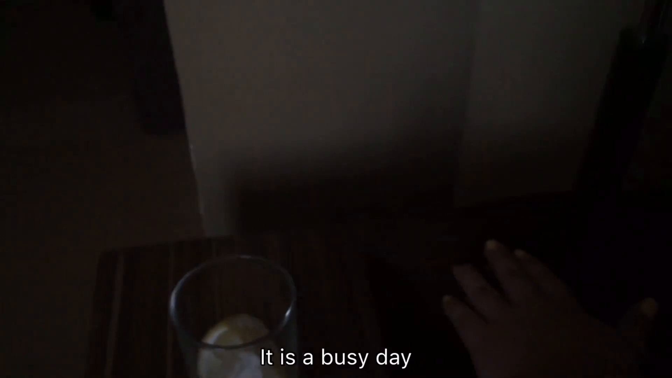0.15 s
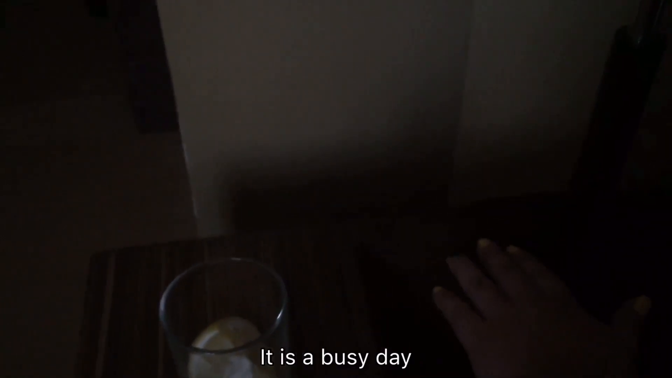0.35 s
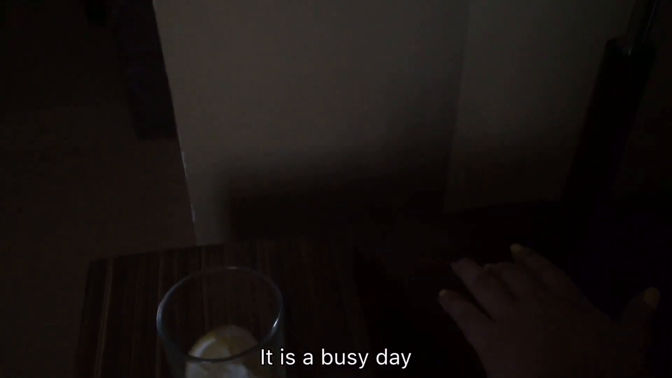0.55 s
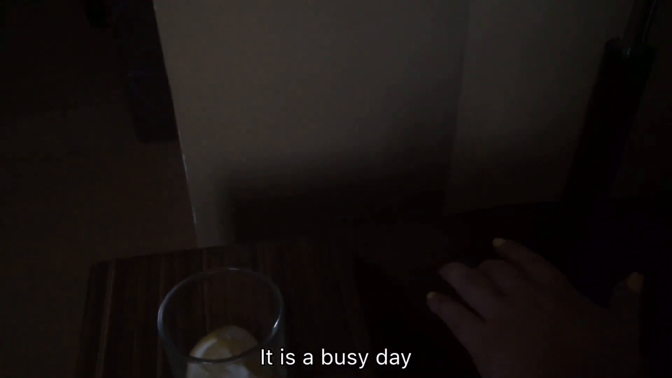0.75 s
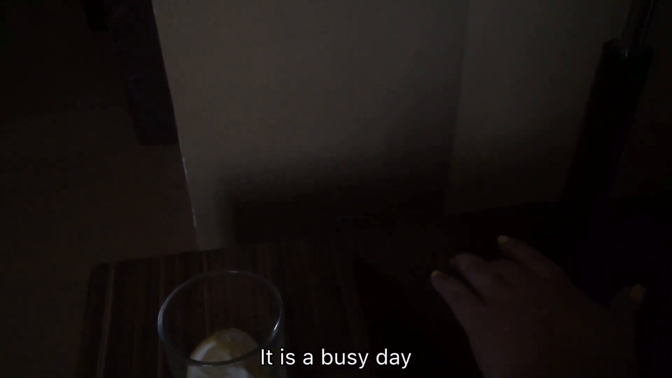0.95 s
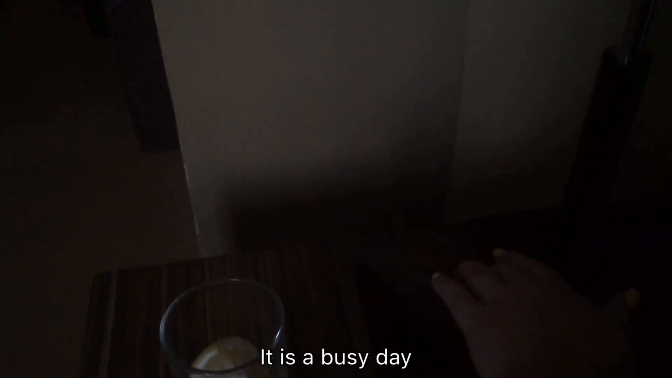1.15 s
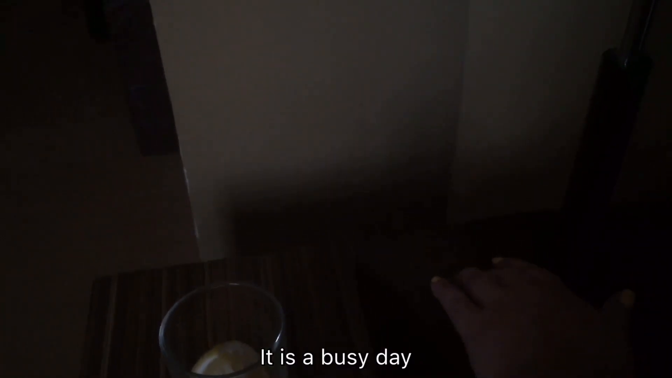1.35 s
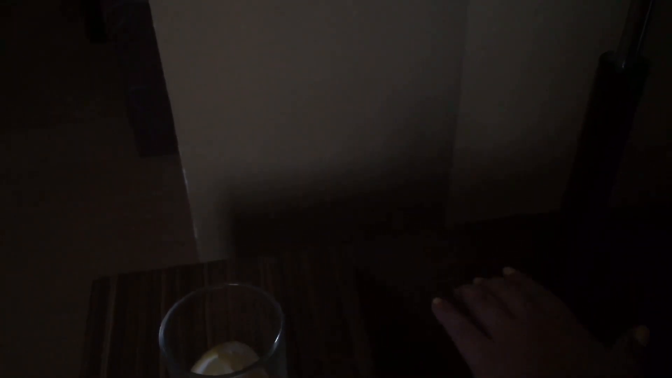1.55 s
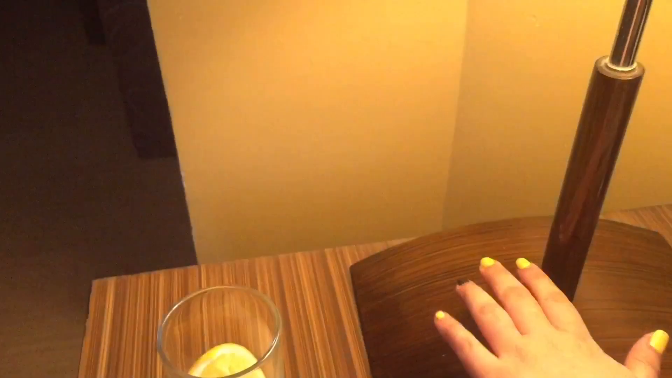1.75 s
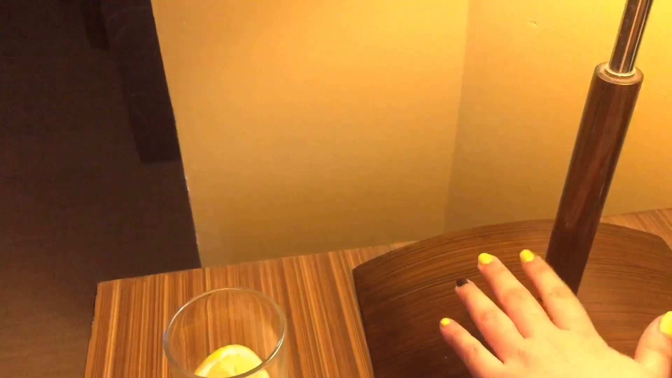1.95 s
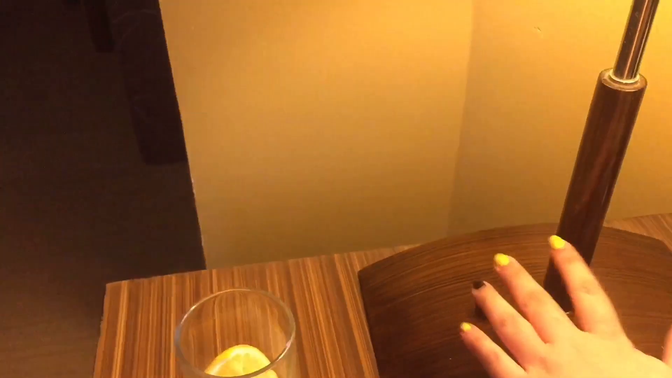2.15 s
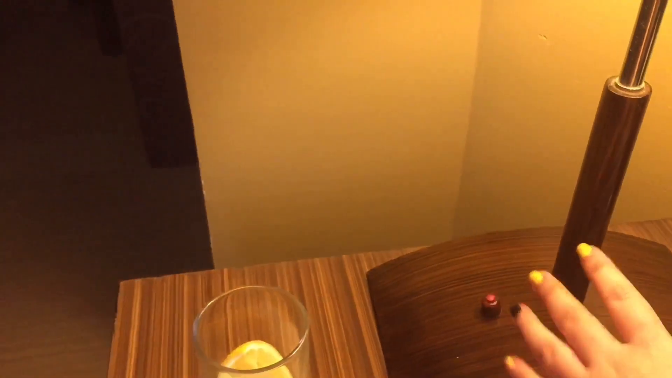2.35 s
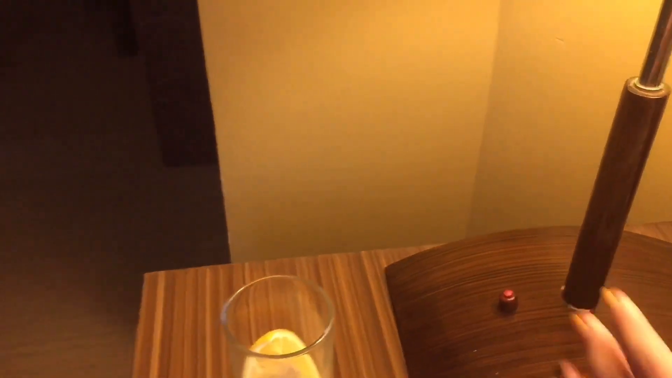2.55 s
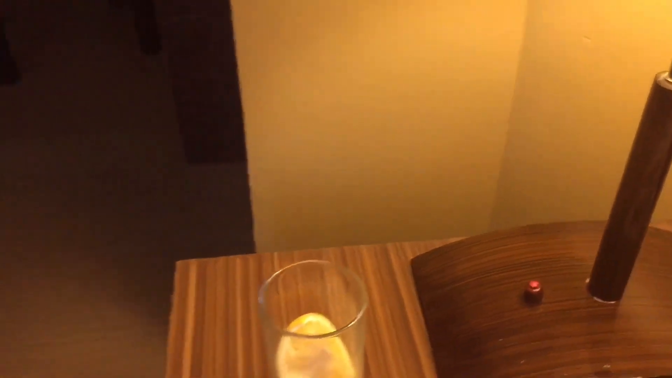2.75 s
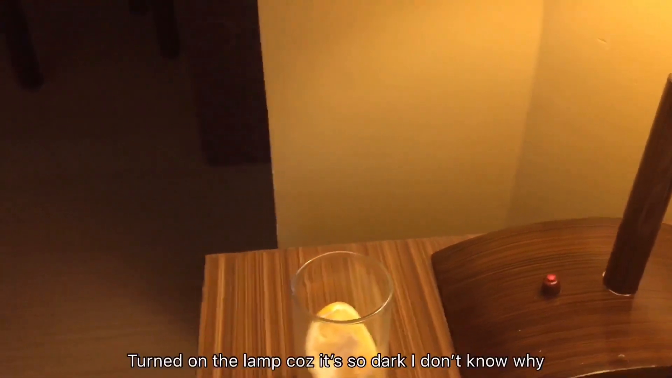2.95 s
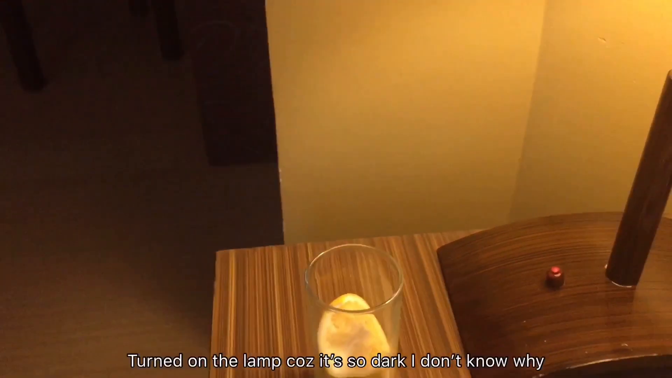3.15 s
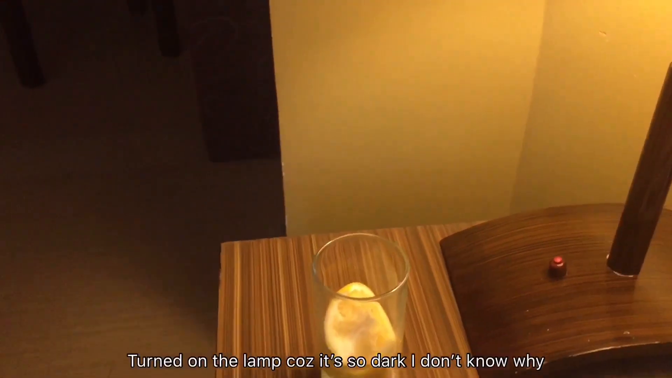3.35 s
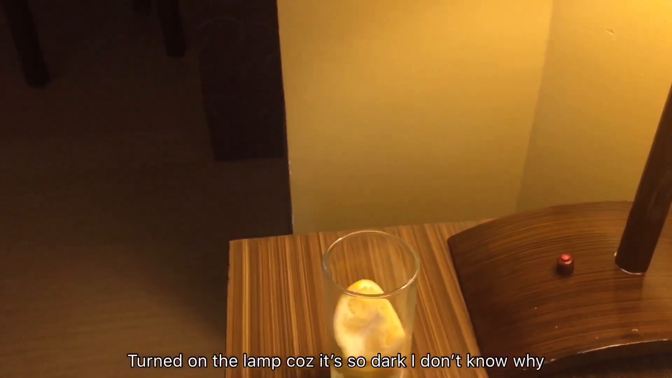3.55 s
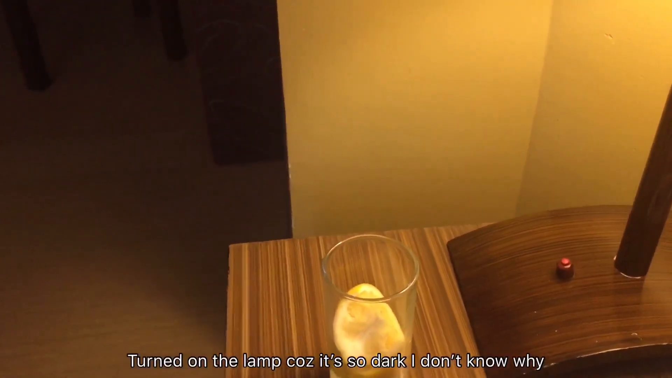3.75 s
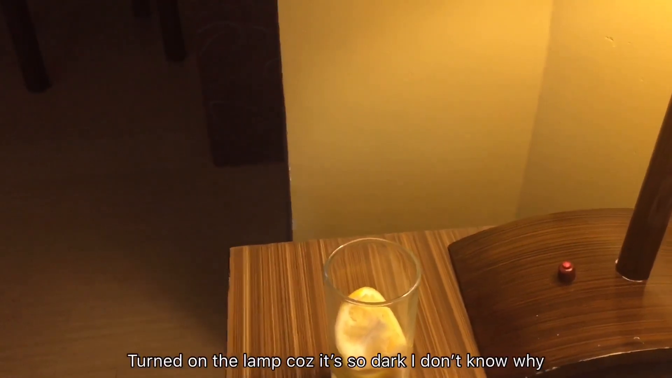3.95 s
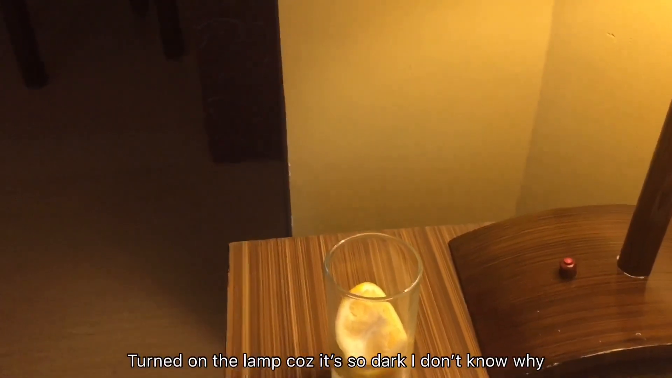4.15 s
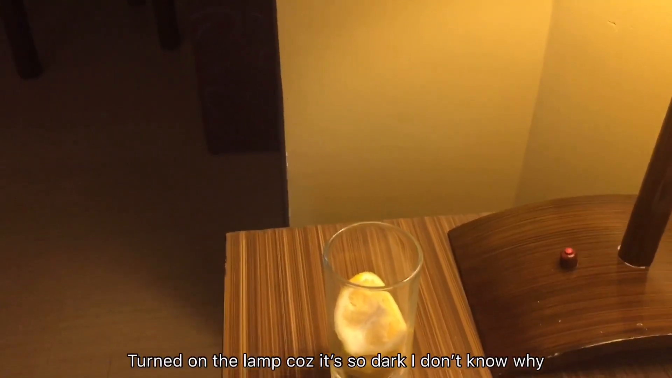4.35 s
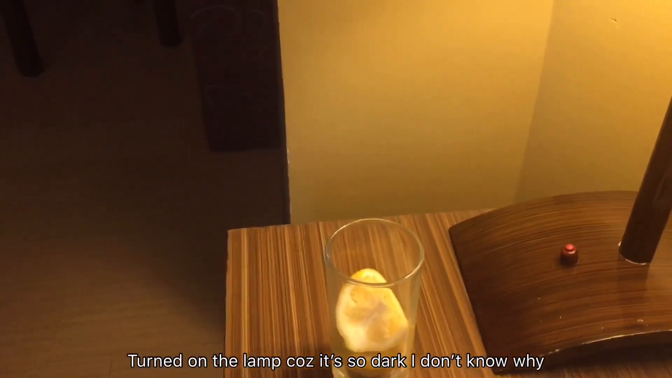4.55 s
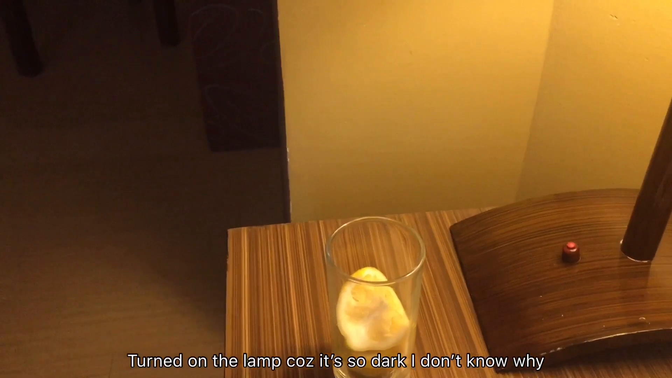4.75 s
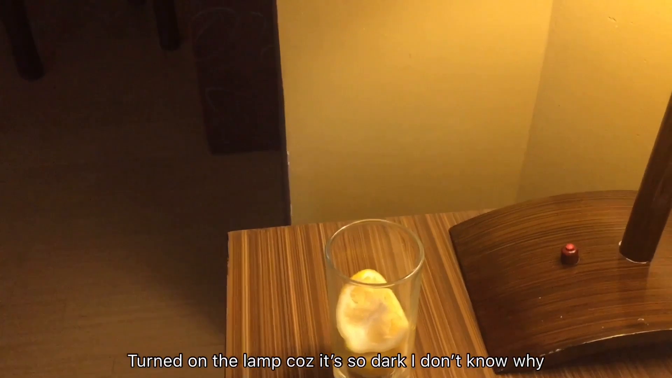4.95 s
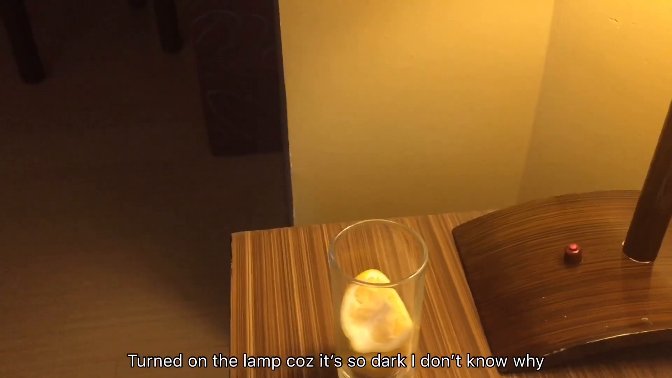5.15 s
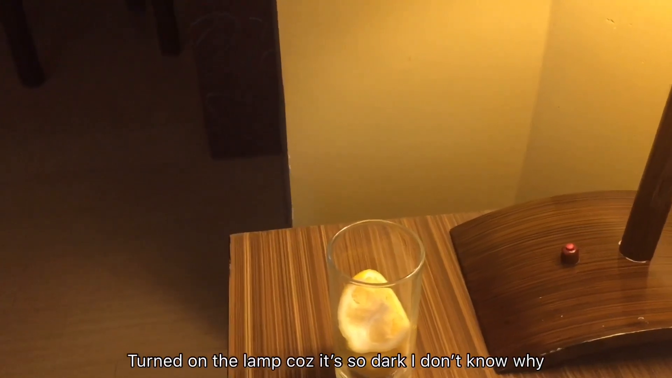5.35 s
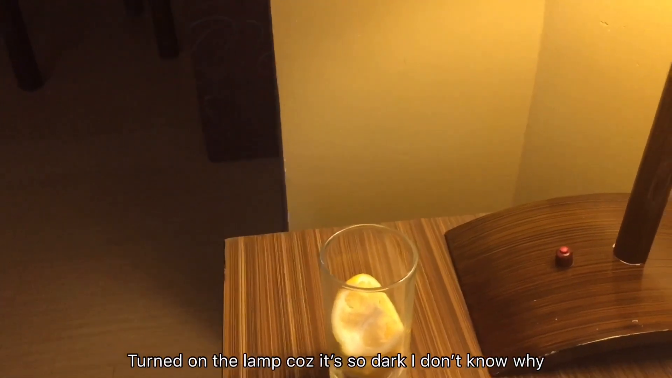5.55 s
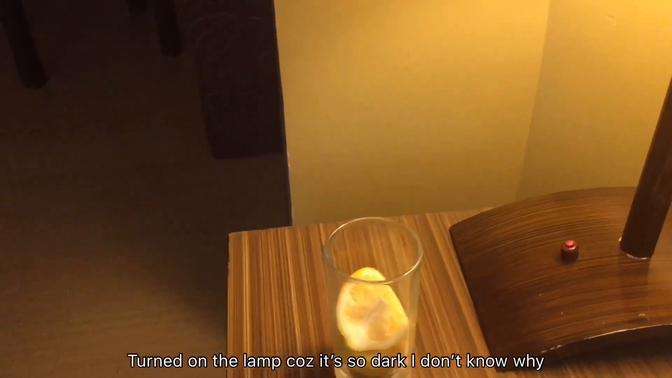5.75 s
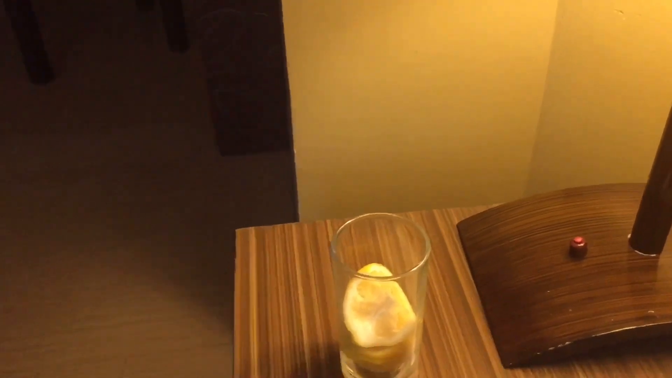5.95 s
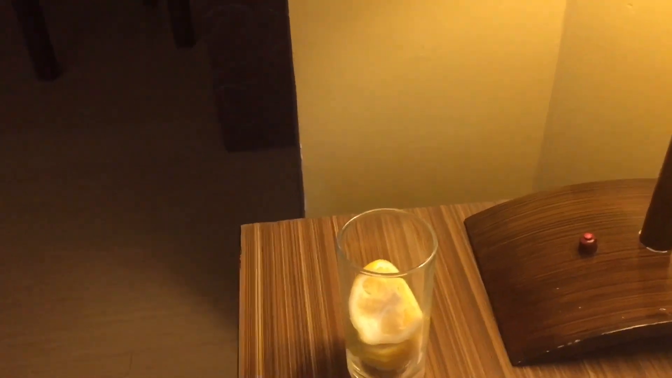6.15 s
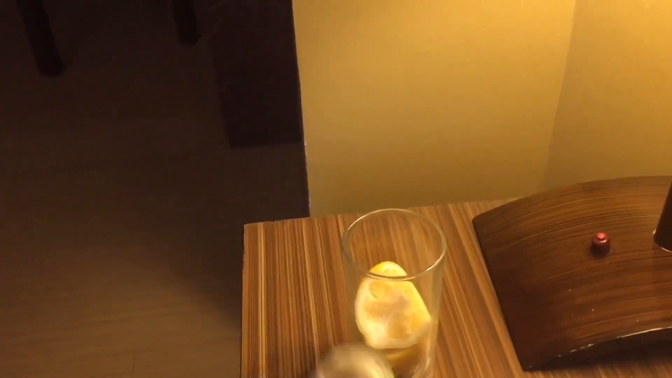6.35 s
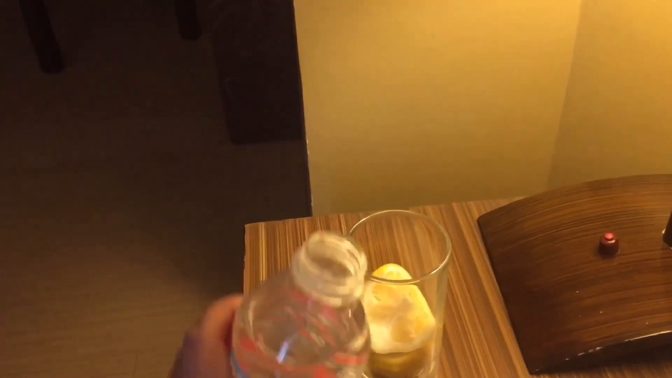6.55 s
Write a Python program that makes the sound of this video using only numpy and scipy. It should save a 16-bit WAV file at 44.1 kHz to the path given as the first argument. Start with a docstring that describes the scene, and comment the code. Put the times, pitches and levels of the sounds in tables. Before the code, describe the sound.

Two sharp switch clicks in a quiet, humming room, followed by the small snaps and creaks of a plastic bottle being opened.

```python
"""A quiet, carpeted hotel room, with the ventilation humming. A finger presses the push switch of a table
lamp: it latches, then snaps over, and the impacts excite the modes of the lamp and the wooden table.
A sleeve brushes as the hand draws back. Close by, a plastic bottle is twisted open: stick-slip friction
makes the cap rasp on its thread, the seal cracks in a few snaps, and the bottle resonates with hollow
knocks. Lamp and bottle leave a short, diffuse reverberation."""
import sys
import numpy as np
from scipy import signal
from scipy.fft import rfft, irfft
from scipy.io import wavfile
from scipy.ndimage import uniform_filter1d

SR = 44100
rng = np.random.default_rng(int(sys.argv[2]) if len(sys.argv) > 2 else 0)


def generate_wav(sig):
    """Save sig (samples, or channels by samples) to the path in sys.argv[1] as 16-bit PCM at SR."""
    pcm = np.round(np.clip(np.atleast_2d(sig).T, -1, 1) * 32767).astype(np.int16)
    wavfile.write(sys.argv[1], SR, pcm)


N = 294588
T = np.arange(N) / SR
AGE = T[:SR // 2]  # seconds since an impact

# The switch's press, then its snap. Each row: start in seconds, ring level in dB, crack tilt in dB per
# octave, crack level and table thump level in dB relative to the ring.
SWITCH_STROKES = [(1.0772, -30, -0.5, -2.5, -10.5), (1.664, -21.5, 1.3, -3.5, -9)]


def amp(db):
    """Amplitude grows tenfold for every 20 dB."""
    return 10 ** (np.asarray(db) / 20)


def level(x, db):
    """The level of a steady sound is set by its rms."""
    return x * amp(db) / np.sqrt(np.mean(x ** 2))


def burst(x, db):
    """The level of a transient is set by its energy, as the rms it would have if packed into 10 ms."""
    return x * amp(db) / np.sqrt(np.sum(x ** 2) / (SR / 100))


def add(track, s, x):
    """Superposition: x joins the track at s seconds."""
    i = int(round(s * SR))
    track[i:i + len(x)] += x[:N - i]


def band(x, low_hz, high_hz, order=2):
    """A causal band-pass filter keeps what lies between two frequencies."""
    high_hz = min(high_hz, .45 * SR)
    edges = [min(low_hz, high_hz - 10), high_hz]
    return signal.sosfilt(signal.butter(order, edges, "band", fs=SR, output="sos"), x)


def around(x, hz, width_hz):
    """A resonance acts as a band-pass whose centre is the geometric mean of its edges."""
    low_hz = np.hypot(hz, width_hz / 2) - width_hz / 2
    return band(x, low_hz, low_hz + width_hz)


def noise(points, size):
    """Spectral shaping: white noise follows (Hz, dB) points and rolls off above the last."""
    hz, db = np.transpose(points)
    f = np.fft.rfftfreq(size, 1 / SR) + 1
    gain = amp(np.interp(np.log(f), np.log(hz), db)) / np.maximum(f / hz[-1], 1) ** 2
    return irfft(rfft(rng.standard_normal(size)) * gain, size)


def fade(t60):
    """Damping gives an exponential decay of 60 dB in t60 seconds."""
    return np.exp(-np.log(1000) * AGE / t60)


def hump(s, half_s):
    """A Gaussian envelope peaks at s seconds and falls to 1/e at half_s to either side."""
    return np.exp(-((T - s) / half_s) ** 2)


def walk(rate_hz):
    """Smoothed random steps give a drift of unit rms."""
    hold = int(SR / rate_hz)
    steps = np.repeat(rng.standard_normal(N // hold + 1), hold)
    return level(uniform_filter1d(steps, hold)[:N], 0)


def ring(modes):
    """Free vibration is a sum of damped (Hz, dB, t60) modes; neighbours swing in opposite senses."""
    return sum((-1) ** k * burst(np.sin(2 * np.pi * hz * AGE) * fade(t60), db)
               for k, (hz, db, t60) in enumerate(modes))


def ventilation(waver_db=3.0, drift_hz=.9, surge_db=0.4, swell_db=12.2, dip_db=-12):
    """Broadband flow noise rumbles in the duct under the tones of fan and motor and a faint hiss."""
    # Spectra of the rush and the hiss. Each row: frequency in Hz, relative spectral density in dB.
    air_spectrum = [(20, -36), (30, -20.5), (42, -21.5), (56, -2.5), (84, -0.5), (108, -9), (145, -4.5),
                    (160, -5), (205, -3.5), (228, -14), (300, -13.5), (450, -27), (580, -25), (700, -31.5),
                    (1100, -32.5), (2000, -35.5)]
    hiss_spectrum = [(1500, -18), (2400, 1.5), (4000, 1.5), (4700, -3.5), (6000, -2.5), (9300, -4.5),
                     (10300, -10), (11500, -6), (15800, -10)]
    # Fan and motor tones that hum along with the drone. Each row: frequency in Hz, rms level in dB.
    fan_tones = [(58.5, -58), (175, -56), (349.5, -79), (583, -75)]
    def tone(hz, db):
        """Slow random modulation makes a tone wander in pitch and strength."""
        phase = 2 * np.pi * np.cumsum(hz + drift_hz * walk(4)) / SR
        return level(np.sin(phase) * amp(waver_db * walk(3.3)), db)
    drone = tone(hz=75.9, db=-56.5) * amp(swell_db * hump(s=2.666, half_s=0.23))  # the fan swells once
    hum = drone + sum(tone(hz, db) for hz, db in fan_tones)
    rush = hum + level(noise(air_spectrum, N) * amp(surge_db * walk(5.5)), db=-50.5)
    bass = signal.sosfiltfilt(signal.butter(2, 300, fs=SR, output="sos"), rush)
    dip = amp(dip_db * hump(s=5.02, half_s=0.035))  # the bass dips briefly
    hiss = level(noise(hiss_spectrum, N), db=-74.5)
    return rush - bass + bass * dip + hiss


def lamp_switch(crack_t60=0.023):
    """Contact bounce: the spring rattles within a few milliseconds, each blow a broadband crack."""
    # Blows within one click. Each row: delay in seconds, relative level in dB.
    contacts = [(0, -3.5), (.0022, -1.5), (.0042, -12)]
    # Spectrum of a blow before its tilt. Each row: frequency in Hz, relative level in dB.
    crack_spectrum = [(250, -14.5), (600, -10), (1300, -6), (4000, 1), (7000, 0.5), (10000, -5.5),
                      (14000, -1.5), (16000, -8.5)]
    out = np.zeros(N)
    for s, db, tilt_db, crack_db, _ in SWITCH_STROKES:
        tilted = [(hz, point_db + tilt_db * np.log2(hz)) for hz, point_db in crack_spectrum]
        for delay, blow_db in contacts:
            blow = noise(tilted, len(AGE)) * fade(crack_t60)
            add(out, s + delay, burst(blow, db + crack_db + blow_db))
    return out


def lamp_ring(swell_s=0.0014, nail_s=2.411, nail_db=-59.5):
    """Modal response: press and snap favour different modes of the lamp, and the table thumps below."""
    # Modes of switch and lamp base. Each row: frequency in Hz, t60 in seconds, relative level in dB on
    # the press and on the snap.
    lamp_modes = [(872.4, 0.13, -10, -27), (1044.4, .08, -4, -25), (1140, 0.11, -8.5, -23),
                  (1525, 0.054, 3.5, 0.5), (2070, 0.074, -11, -0.5), (2183, .035, -4, -4.5),
                  (2580, .03, 3, -12.5), (3000, .03, -1, -3), (3700, 0.033, -14, -8),
                  (4080, 0.049, -1.5, -7), (4320, 0.029, -2, -6), (4470, .035, -2, -9.5),
                  (4760, 0.027, -19, -8.5), (5512, 0.028, -10, -2), (5650, 0.024, -19, 3),
                  (6480, .017, -15, 0.5), (6910, 0.028, 2, -1), (8545, 0.016, -3, -5),
                  (9800, 0.033, -4, -10), (10470, 0.014, -27, -8.5), (13030, 0.032, -12, -7),
                  (13100, 0.037, -12, -12.5)]
    # Modes of the wooden table. Each row: frequency in Hz, relative level in dB, t60 in seconds.
    table_modes = [(144.4, 2, 0.23), (122, -5, 0.18)]
    out = np.zeros(N)
    swell = 1 - np.exp(-AGE / swell_s)  # the ring grows while the blows last
    for stroke, (s, db, _, _, thump_db) in enumerate(SWITCH_STROKES):
        modes = [(hz, stroke_db[stroke], t60) for hz, t60, *stroke_db in lamp_modes]
        add(out, s, burst(ring(modes) * swell, db))
        add(out, s, burst(ring(table_modes) * swell, db + thump_db))
    # A fingernail grazes the lamp as the hand leaves.
    graze = ring([(hz, press_db, t60) for hz, t60, press_db, _ in lamp_modes])
    add(out, nail_s, burst(band(graze, 820, 3500), nail_db))
    return out


def sleeve(low_hz=2000, high_hz=14000, grain_db=1.0):
    """Sliding friction of cloth gives a faint, fine-grained hiss."""
    grains = rng.standard_normal(N) * amp(grain_db * walk(170))
    cloth = band(grains, low_hz, high_hz, order=1)
    return level(cloth, db=-67.5) * hump(s=2.87, half_s=0.087)


def plastic_bandwidth(hz, width_at_4khz=5600, growth=0.78):
    """A power law gives the bandwidth in Hz of stressed plastic: brighter sounds are also wider."""
    return width_at_4khz * (hz / 4000) ** growth


def plastic_crack(hz, width_hz, t60, spike=5, body_db=-17):
    """Sudden stress release: plastic gives way with a spike and a short crackle, over a duller body."""
    force = rng.standard_normal(len(AGE)) * fade(t60)
    force[0] += spike
    return burst(around(force, hz, width_hz), 0) + burst(band(force, 500, 2700, order=1), body_db)


def bottle_snaps(first_db=-2.5, rebound_s=.0026, rebound_db=-4.5, rebound_pitch=0.74):
    """Impulse excitation: each snap rings cap and bottle, then rebounds weaker and duller."""
    # Snaps of cap and seal. Each row: start in seconds, base crack level in dB, centre in Hz, t60 in
    # seconds, cap ring level in dB, bottle knock level in dB.
    snaps = [(3.265, -42.5, 2900, 0.068, -60, -66), (3.2801, -47, 9500, .03, -51, -69),
             (3.9580, -43, 2200, .07, -62, -57), (3.9898, -32, 4650, 0.013, -53, -48.5),
             (4.1291, -36, 4000, 0.014, -43, -50), (4.2030, -47, 2900, 0.027, -56, -69),
             (4.2095, -46.5, 4500, .026, -46, -45.5), (4.593, -59, 1910, .05, -60.5, -49.5),
             (4.620, -60.5, 7000, .022, -64, -49), (6.037, -48.5, 10500, 0.033, -64, -65)]
    # Modes of the cap and the bottle's body. Each row: frequency in Hz, relative dB, t60 in seconds.
    cap_modes = [(1676, -5.5, 0.038), (3085, 2, .055), (3820, 2.5, .028), (9780, -4, .018)]
    bottle_modes = [(358, -1, 0.053), (557, 9.5, 0.19), (638, 1, 0.031), (883, 2.5, 0.041),
                    (1150, -2.5, 0.14), (1280, -7, 0.21)]
    # Fingers tick on the plastic, ringing nothing. Each row: start in seconds, level in dB, centre in Hz.
    finger_ticks = [(3.736, -72, 10500), (4.3912, -61.5, 2860), (4.502, -60.5, 6270)]
    out = np.zeros(N)
    for s, db, hz, t60, cap_db, knock_db in snaps:
        width_hz = plastic_bandwidth(hz)
        add(out, s, amp(db + first_db) * plastic_crack(hz, width_hz, t60))
        add(out, s, burst(ring(cap_modes), cap_db) + burst(ring(bottle_modes), knock_db))
        add(out, s + rebound_s, amp(db + rebound_db) * plastic_crack(hz * rebound_pitch, width_hz, t60))
    for s, db, hz in finger_ticks:
        add(out, s, amp(db) * plastic_crack(hz, width_hz=0.55 * hz, t60=0.018))
    return out


def bottle_thuds(rise_s=0.0032):
    """Single damped modes give the bottle's low thuds under the snaps and a few soft handling bumps."""
    # Thuds and bumps. Each row: start in seconds, level in dB, frequency in Hz, t60 in seconds.
    thuds = [(3.266, -51, 324, 0.062), (3.989, -47, 355, 0.023), (4.129, -46.5, 694, 0.031),
             (4.18, -43.5, 169, 0.19), (4.210, -49.5, 307, 0.049), (4.236, -40.5, 163, 0.048),
             (6.632, -39.5, 86, 0.1)]
    out = np.zeros(N)
    rise = 1 - np.exp(-AGE / rise_s)
    for s, db, hz, t60 in thuds:
        add(out, s, burst(ring([(hz, 0, t60)]) * rise, db))
    return out


def cap_twists(grain_db=3.6, slip_hz=500, skirt_db=-8, narrow_width_ratio=.13):
    """Stick-slip friction rasps and squeaks as the cap is twisted; moving water adds a few low blips."""
    # The cap rasps on its thread; plastic squeaks, and water moving in the bottle gives a few low blips.
    # Each row: middle in seconds, half length in seconds, level in dB, centre in Hz.
    rasps = [(3.293, 0.021, -52, 7200), (3.66, .045, -70, 5400), (3.959, 0.03, -57.5, 6300),
             (4.619, .03, -65, 2200), (5.117, .012, -66.5, 9000), (6.03, 0.054, -73, 8000)]
    squeaks_and_blips = [(3.427, 0.015, -72, 6850), (3.511, 0.022, -68, 6700), (3.671, .027, -66, 3250),
                         (3.672, .022, -70, 5760), (4.51, 0.032, -71, 6270), (4.615, 0.026, -63, 2980),
                         (4.64, .027, -61, 950), (5.117, 0.011, -53, 3560), (5.118, .014, -61, 13100),
                         (6.045, 0.032, -64, 1220), (6.151, .012, -59, 1280)]
    # The loosened cap is spun off in four light, even turns, with the same columns.
    turns = [(4.985 + k * .133, 0.031, -73, 3140) for k in range(4)]
    grains = rng.standard_normal(N) * amp(grain_db * walk(slip_hz))
    def stroke(s, half_s, db, hz, width_hz):
        """Grainy noise swells and fades in a resonant core with a wide, hissy skirt."""
        core = around(grains, hz, width_hz)
        skirt = band(grains, hz / 2, hz * 2, order=1)
        return (level(core, db) + level(skirt, db + skirt_db)) * hump(s, half_s)
    broad = sum(stroke(s, half_s, db, hz, plastic_bandwidth(hz)) for s, half_s, db, hz in rasps)
    narrow = sum(stroke(s, half_s, db, hz, narrow_width_ratio * hz)
                 for s, half_s, db, hz in squeaks_and_blips + turns)
    return broad + narrow


def reflections(x, bass_t60=0.37, treble_t60=0.27, build_s=0.0066, dull_hz=13000):
    """Reverberation: dense reflections build up quickly, and absorption takes their treble first."""
    edges_hz = np.geomspace(200, 18000, 8)
    t60s = np.geomspace(bass_t60, treble_t60, len(edges_hz) - 1)
    tail = sum(band(rng.standard_normal(len(AGE)), low, high) * fade(t60)
               for low, high, t60 in zip(edges_hz, edges_hz[1:], t60s))
    build_up = 1 - np.exp(-(AGE / build_s) ** 2)
    tail = band(tail, 150, dull_hz, order=1) * build_up
    return signal.fftconvolve(x, tail / np.sqrt(np.sum(tail ** 2)))[:N]


def diffuse_field(source, directions=3):
    """A click radiates a different fine pattern towards each wall, so its echoes add incoherently."""
    return sum(reflections(source()) for _ in range(directions)) / np.sqrt(directions)


def scene(crack_room_db=-12.5, ring_room_db=-14, bottle_room_db=-12.5):
    """Direct and reverberant sound of lamp and bottle superpose on the ventilation."""
    ringing, twists = lamp_ring(), cap_twists()
    lamp = lamp_switch() + ringing
    lamp += amp(crack_room_db) * diffuse_field(lamp_switch) + amp(ring_room_db) * reflections(ringing)
    bottle = bottle_snaps() + twists
    bottle += amp(bottle_room_db) * (diffuse_field(bottle_snaps) + reflections(twists))
    return (lamp + bottle + bottle_thuds() + sleeve() + ventilation())[None]


def record(dry):
    """Band limiting: a steep low-pass filter cuts the treble above 16 kHz."""
    return signal.sosfilt(signal.ellip(10, .2, 70, 16000, fs=SR, output="sos"), dry)


dry = scene()
out = record(dry)
generate_wav(out)
```